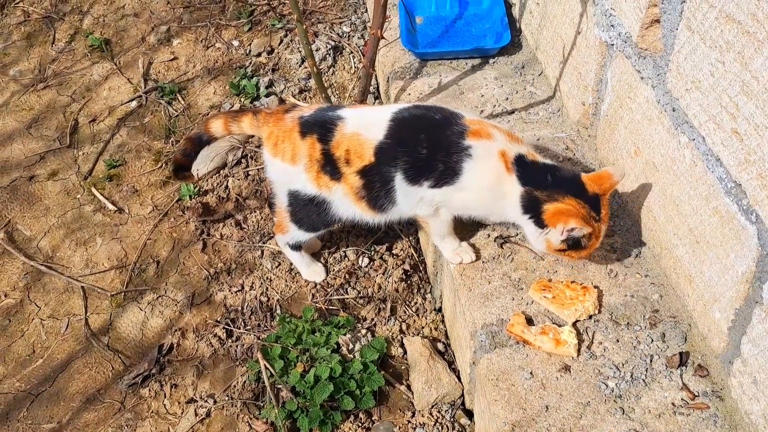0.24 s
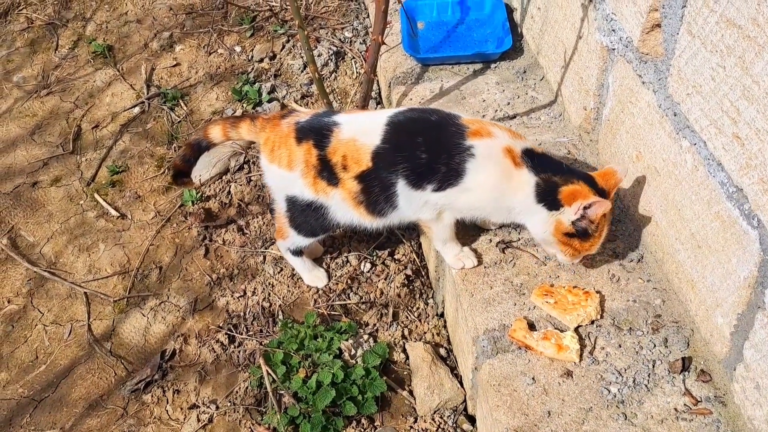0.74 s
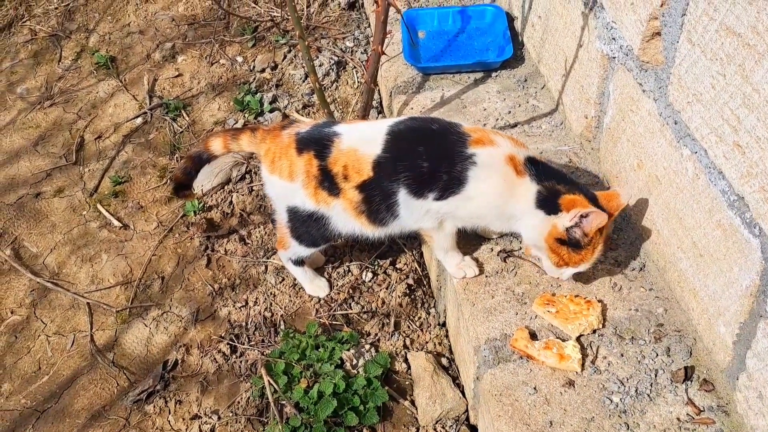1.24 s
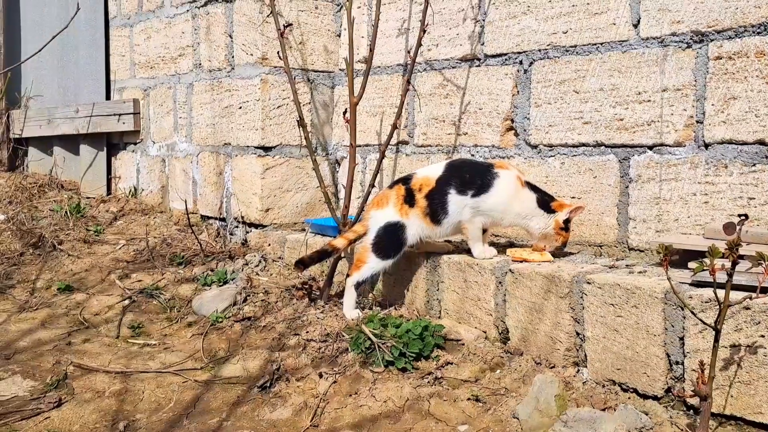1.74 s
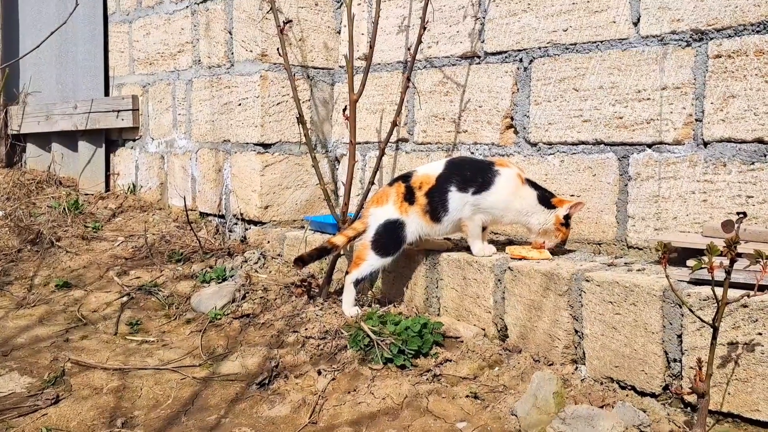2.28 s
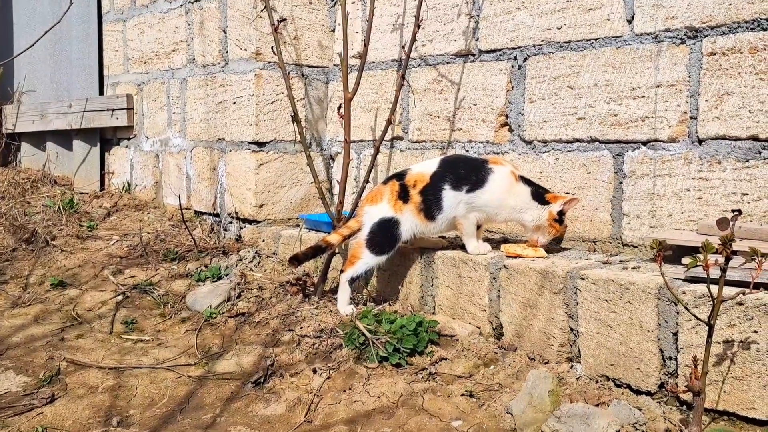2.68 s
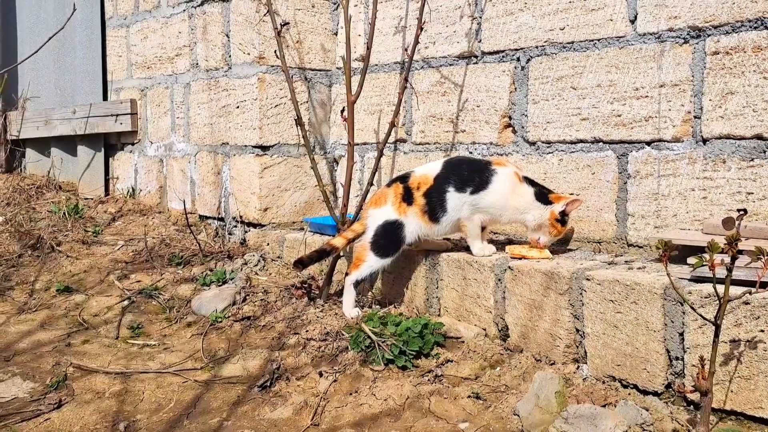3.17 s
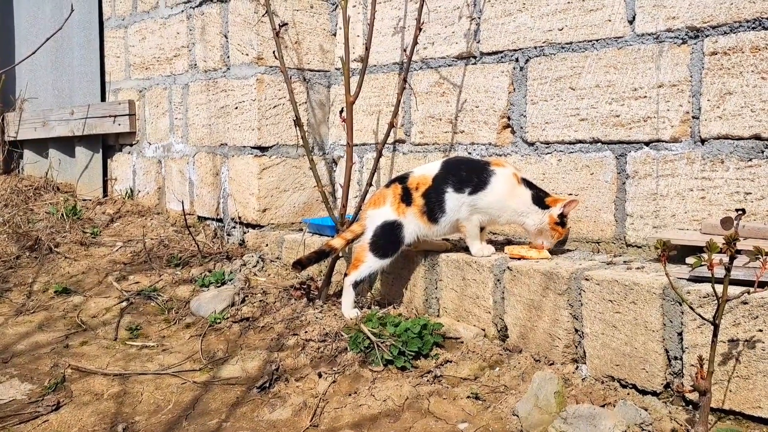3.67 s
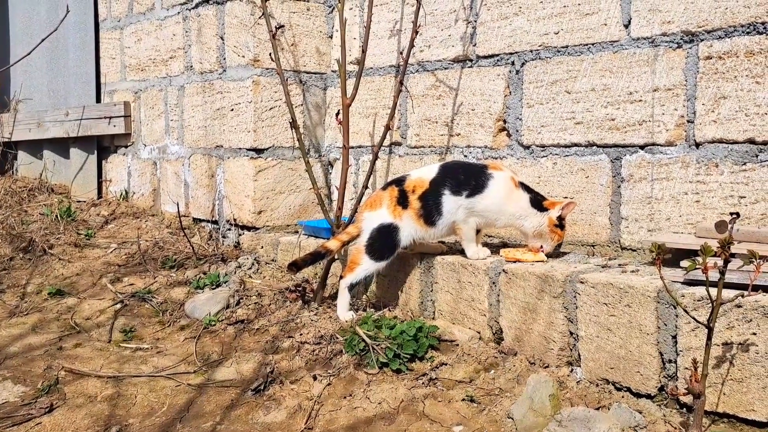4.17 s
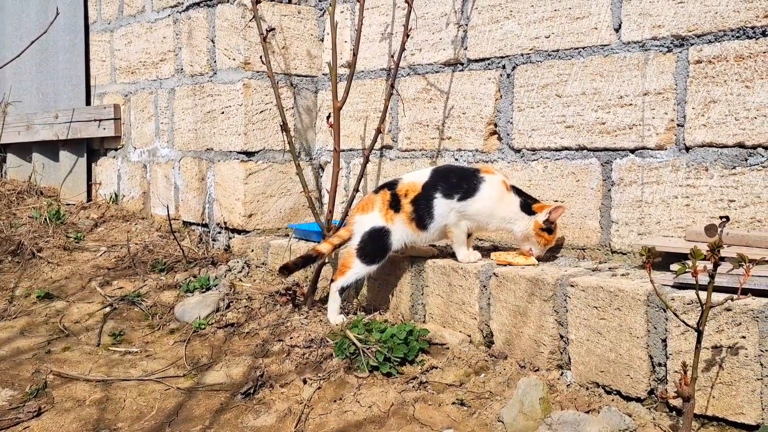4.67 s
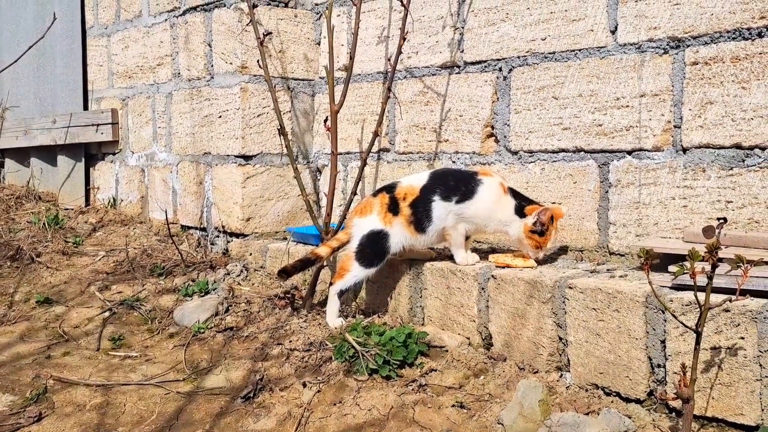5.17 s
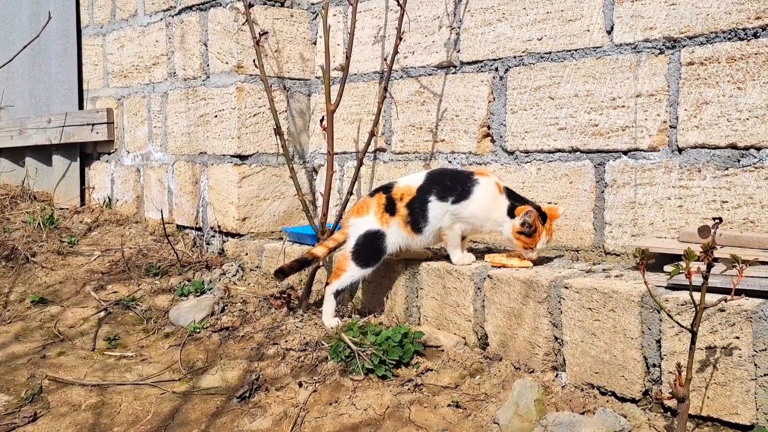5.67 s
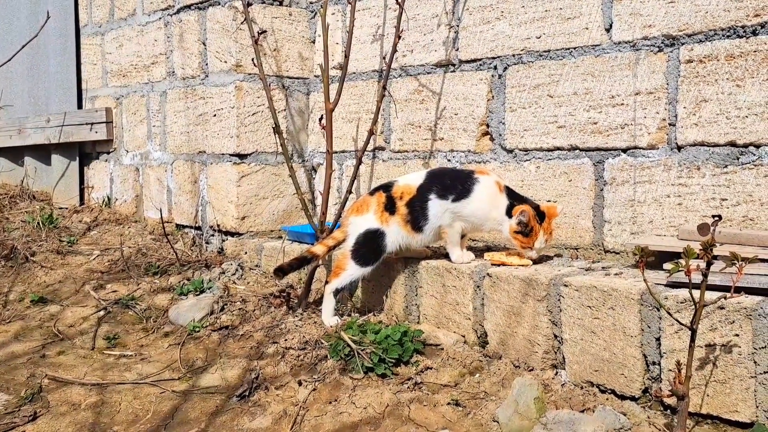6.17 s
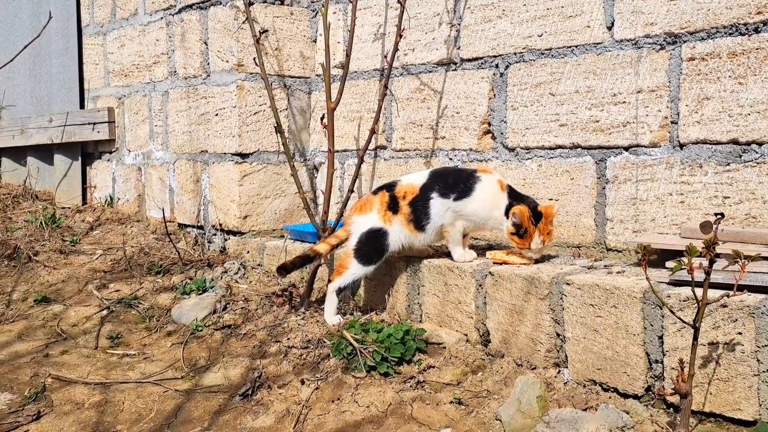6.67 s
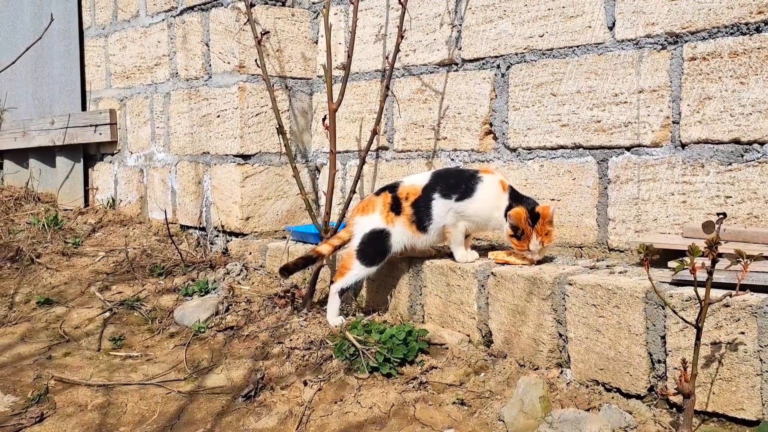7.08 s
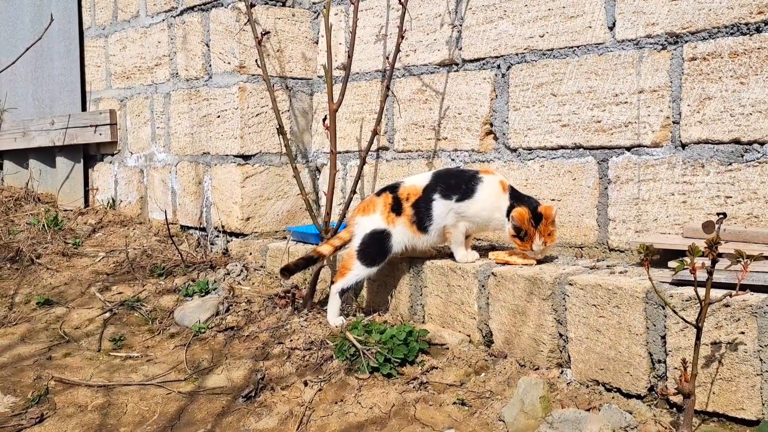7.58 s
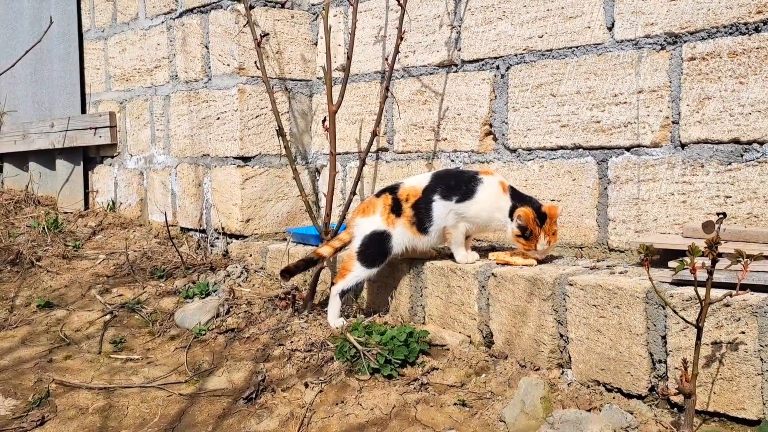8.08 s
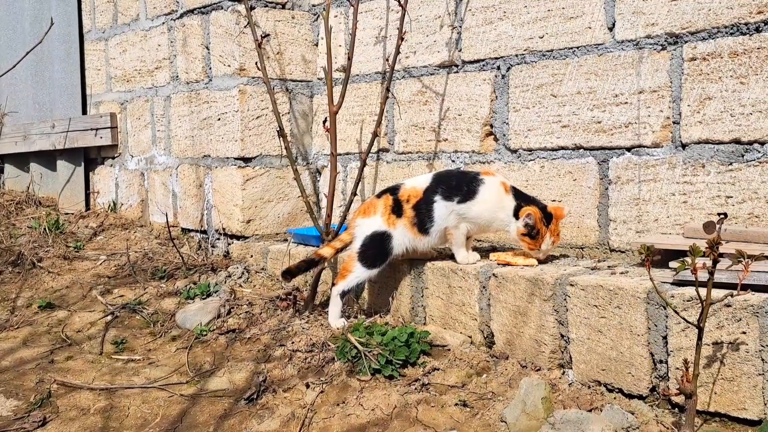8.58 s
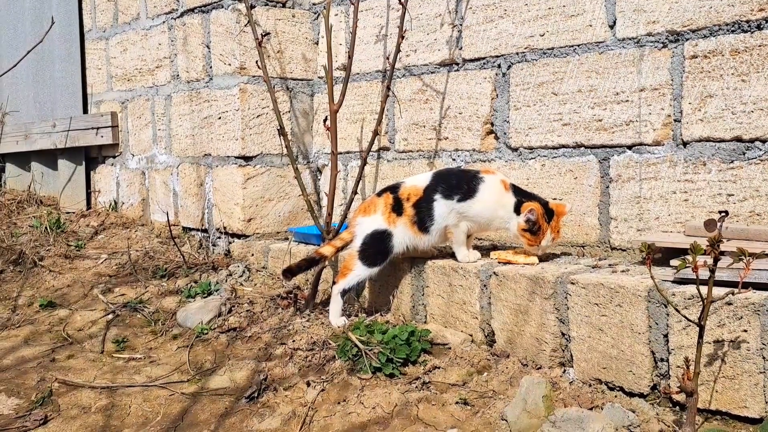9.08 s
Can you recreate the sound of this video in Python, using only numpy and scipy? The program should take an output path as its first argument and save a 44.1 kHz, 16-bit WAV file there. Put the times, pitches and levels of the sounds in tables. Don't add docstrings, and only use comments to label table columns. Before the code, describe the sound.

Small birds whistle and chirp in a quiet yard over low distant traffic rumble, with a burst of loud handling knocks and rubs early on.

```python
import sys
import numpy as np
from scipy import signal
from scipy.fft import rfft, irfft
from scipy.io import wavfile
from scipy.ndimage import uniform_filter1d

SR = 44100
rng = np.random.default_rng(int(sys.argv[2]) if len(sys.argv) > 2 else 0)


def digitize_waveform(pressure):
    field = np.atleast_2d(pressure).T
    bounded = np.clip(field, -1, 1)
    quanta = np.round(bounded * 32767).astype(np.int16)
    wavfile.write(sys.argv[1], SR, quanta)


def gain_from_decibels(decibels):
    exponent = np.asarray(decibels, float) / 20
    return 10 ** exponent


N = 411894
LAG = 21
FAINT_PAN_DB = -6


def evened(x):
    return x / np.sqrt(np.mean(x ** 2) + 1e-20)


def read(points, hz):
    f, value = np.transpose(points)
    return np.interp(np.log(hz + 1), np.log(f + 1), value)


def add(mix, s, sound):
    part = mix[..., round(s * SR):][..., :sound.shape[-1]]
    part += sound[..., :part.shape[-1]]


def wander(count, hz):
    smoother = signal.butter(4, hz, fs=SR, output="sos")
    settle = 4000
    return evened(signal.sosfilt(smoother, rng.standard_normal(count + settle))[settle:])


def sing(shape, db, pan_db, trill_hz=210., swing_hz=0., throb=0., rough=0., blur_hz=0., octave_db=-47.0,
         third_db=-79.0):
    s, hz, shape_db = np.transpose(shape)
    t = np.arange(0, s[-1], 1 / SR)
    trill = np.sin(2 * np.pi * trill_hz * t)
    hz = uniform_filter1d(np.interp(t, s, hz), size=80)
    hz = hz + swing_hz * trill + blur_hz * wander(len(t), 400.)
    phase = 2 * np.pi * np.cumsum(hz) / SR
    level = gain_from_decibels(db + np.interp(t, s, shape_db))
    level = level * (1 + throb * trill + rough * wander(len(t), 120.0))
    tone = np.sin(phase) + gain_from_decibels(octave_db) * np.sin(2 * phase) + gain_from_decibels(third_db) * np.sin(3 * phase)
    tone = level * tone * signal.windows.tukey(len(t), .08)
    left, right = np.pad(tone, (0, LAG)), np.pad(tone, (LAG, 0))
    return np.array([left, gain_from_decibels(-pan_db) * right])


def whistle(mix, s, length, db, hz, sag_hz_per_s, pan_db, rough=.22):
    end_hz = hz - sag_hz_per_s * length
    shape = [(0, hz + 40, -16),
             (.3 * length, .7 * hz + .3 * end_hz, -2),
             (.7 * length, .2 * hz + .8 * end_hz, 0),
             (length, end_hz, -10)]
    add(mix, s, sing(shape, db, pan_db, rough=rough, octave_db=-55, third_db=-54))


def whistlers(near, far):
    # start in seconds, level of the high note in dB, of the low note in dB, high pitch in Hz,
    # left-right balance in dB.
    pairs = [
        (2.141, -45.5, -39.5, 4530, -2.5),
        (2.363, -38, -38.5, 4510, -4.5),
        (2.896, -33.5, -36, 4605, -7),
        (6.743, -36, -30.5, 4587, -6.5),
        (6.949, -30, -28.5, 4540, -4),
    ]
    # start in seconds, level of the first note in dB, of the repeat in dB, pitch in Hz,
    # left-right balance in dB.
    doubles = [
        (0.809, -51.5, -52, 4400, 0),
        (1.485, -42.5, -51, 4350, 13),
        (7.576, -45, -47, 4365, -6),
        (8.235, -42.5, -46.5, 4344, -3),
        (8.954, -54, -52.5, 4297, -9),
    ]
    # start in seconds, length in seconds, level in dB, pitch in Hz.
    faint = [(1.793, 0.04, -72, 4560), (2.347, 0.041, -53, 4300), (3.088, 0.1, -76.5, 4470),
             (4.652, 0.023, -66.5, 4570), (4.7, 0.037, -74, 4560), (4.745, 0.034, -71, 4000),
             (4.845, 0.053, -59, 4554), (4.966, 0.022, -69.5, 3430), (5.198, 0.03, -59, 4560),
             (5.25, 0.067, -75, 4610), (5.368, 0.087, -62, 4564), (5.522, 0.033, -73, 3400),
             (5.617, .035, -74.5, 6720), (5.734, 0.035, -60, 4600), (5.774, 0.054, -68, 4580),
             (5.92, 0.048, -64, 4580), (6.267, 0.11, -59, 4590), (6.62, 0.048, -71, 4330),
             (7.087, 0.098, -56, 4360), (7.548, .04, -60, 4540), (7.899, 0.044, -62.5, 4480)]
    for s, db, low_db, hz, pan_db in pairs:
        whistle(near, s, .043, db, hz, 1700, pan_db)
        whistle(near, s + .055, .052, low_db, hz - 142.2, 1700, pan_db - 1)
    for s, first_db, again_db, first_hz, pan_db in doubles:
        for at, db, hz in [(s, first_db, first_hz), (s + .165, again_db, first_hz - 30)]:
            whistle(near, at, .092, db, hz, 750, pan_db)
            snap = [(0, 3000, -3), (.008, 7800, 0)]
            add(far, at - .005, sing(snap, db - 18, pan_db, rough=.5))
    for s, length, db, hz in faint:
        whistle(near, s, length, db, hz, 200, FAINT_PAN_DB, rough=.3)


def chips(near):
    # start in seconds, level in dB, lowest pitch in Hz, highest pitch in Hz.
    chip_rows = [
        (.168, -87, 6650, 8000),
        (4.424, -73, 4470, 8700),
        (5.536, -74, 6730, 7800),
        (5.648, -66.5, 6110, 7770),
        (5.9, -70, 4755, 7000),
        (6.929, -61.5, 3790, 6550),
        (7.093, -60.5, 3430, 7640),
        (8.48, -69.5, 7140, 8000),
        (8.715, -74, 6840, 7740),
        (8.798, -79, 10000, 11780),
    ]
    for s, db, low_hz, high_hz in chip_rows:
        shape = [(0, low_hz, 0.017), (.008, high_hz, 0.0073)]
        add(near, s, sing(shape, db, FAINT_PAN_DB, rough=0.33))


def songs(near, far):
    # seconds after its start, pitch in Hz, level in dB.
    rise = [(0, 2400, -35), (.015, 3000, -28), (.027, 3550, -11), (.04, 3780, -9), (.052, 4110, 0),
            (.068, 4170, -2), (.093, 3950, -13)]
    lead = [(0, 3543, -17), (.012, 3588, 2), (.035, 3640, -1.5)]
    seep = [(0, 7750, 0), (.012, 7600, 4), (.045, 7240, 5), (.07, 7230, -1), (.088, 7230, -22)]
    fall = [(0, 5330, -3.5), (.018, 5150, 7), (.04, 4803, 0), (.058, 4400, -4), (.072, 4030, -2.5),
            (.11, 3909, -1), (.18, 3816, -4.5)]
    buzz = [(0, 3920, -17), (.04, 3933, 1), (.065, 3912, -0.5), (.1, 3920, -6.5), (.135, 3936, -24)]
    arch = [(0, 4700, -16), (.012, 5200, -6), (.026, 5550, 0), (.037, 5600, 0), (.046, 4900, -8)]
    drift = [(0, 7850, -3), (.03, 7700, 0), (.15, 7300, -4), (.3, 6700, -5), (.4, 6300, -12)]
    slide = [(0, 7810, -8.5), (.04, 7900, -13.5), (.1, 6500, -24.5), (.13, 6310, -25.5)]
    # start in seconds, peak in dB, pitch factor, left-right balance in dB.
    rises = [(0.855, -45, 0.99, -8.5), (1.043, -60, 1.04, -5), (1.121, -44.5, 0.97, -9.5),
             (1.391, -43, 0.96, -5), (1.623, -40.5, 1, 3.5), (3.177, -39, 0.97, -4), (4.258, -40, 1, -7),
             (4.527, -35, .99, -3), (6.008, -35.5, 1, -4.5), (6.258, -33.5, .995, -3.5)]
    seeps = [
        (0.681, -57.5, .98, -12.5),
        (4.09, -51.5, 0.98, -11.5),
        (5.83, -58, 0.99, -17),
    ]
    falls = [
        (1.143, -54, 1.016, -4.5),
        (1.838, -47, .99, 17),
        (2.525, -41, 1.006, -4.5),
        (7.28, -47, 1.01, -5.5),
        (7.921, -45.5, 1, -4),
        (8.575, -53, 1.046, -10),
        (9.298, -49, 1.03, -3.5),
    ]
    buzzes = [
        (1.245, -53, .98, -6),
        (2.64, -43, .995, -8),
        (2.81, -56, .99, -6),
        (7.203, -33, 1, -7),
    ]
    arches = [(3.592, -73, .97, -12), (3.659, -67, 1, -12), (3.747, -65, 1, -12), (3.852, -66, 1, -12),
              (3.975, -69, .98, -9), (6.235, -64, 1, -6), (6.33, -61, 1, -6), (6.44, -61, .97, -8),
              (8.685, -67, 1, -5.5), (8.758, -62, 1.03, -6), (8.85, -61, 1.01, -7), (8.96, -61, 1.03, -8)]
    drifts = [
        (6.796, -69.5, 0.96, -8.5),
    ]
    slides = [
        (2.061, -66, 0.89, 11),
        (6.795, -57.5, 0.86, -1.5),
        (6.889, -56, 0.92, -3),
        (6.991, -57.5, 0.9, -7),
        (7.07, -64.5, 0.86, -5),
    ]
    # multiple, level in dB.
    arch_stack = [
        (12, 0),
        (13, -2),
        (14, 0),
        (18, -9),
    ]
    leads = np.add(rises, [-.014, -25, .015, 0])
    hooks = np.concatenate([np.multiply(arches, [1, 1, k / 14, 1]) + [0, db, 0, 0] for k, db in arch_stack])
    voices = [
        (rise, rises, far, dict(rough=.5, throb=.3, trill_hz=150, blur_hz=85, octave_db=-32)),
        (lead, leads, far, dict(rough=0.44, blur_hz=60.3)),
        (seep, seeps, near, dict(rough=.3, octave_db=-50)),
        (fall, falls, far, dict(swing_hz=185, throb=-.3, rough=.3, blur_hz=42, trill_hz=220)),
        (buzz, buzzes, near, dict(swing_hz=110, throb=.2, rough=.2, blur_hz=25, trill_hz=215, octave_db=-44)),
        (arch, hooks, near, dict(rough=.4, blur_hz=60, octave_db=-60)),
        (drift, drifts, far, dict(rough=.7, blur_hz=260, octave_db=-60)),
        (slide, slides, far, dict(rough=.6, blur_hz=200, octave_db=-60))]
    for shape, rows, mix, voice in voices:
        for s, db, pitch, pan_db in rows:
            add(mix, s, sing(np.multiply(shape, [1, pitch, 1]), db, pan_db, **voice))


def yard(x, t60, start):
    t = np.arange(SR // 2) / SR
    hits = rng.random((2, len(t))) < .04
    taps = rng.standard_normal((2, len(t))) * hits * gain_from_decibels(-60 * t / t60) * (t > start)
    taps = taps / np.linalg.norm(taps, axis=1)[:, None]
    return signal.fftconvolve(x, taps, axes=1)[:, :N]


def birds():
    near, far = np.zeros((2, 2, N))
    whistlers(near, far)
    chips(near)
    songs(near, far)
    near_echo = gain_from_decibels(-7.5) * yard(near, .14, .006) + gain_from_decibels(-23) * yard(near, .8, .021)
    far_echo = gain_from_decibels(-3.5) * yard(far, .13, .002) + gain_from_decibels(-19) * yard(far, .45, .03)
    return near + near_echo + far + far_echo


def stroke(length, bright, grit):
    # frequency in Hz, level in dB per Hz.
    heavy_colour = [(18, -39.5), (30, 6.5), (145, 2.5), (540, -8), (632, -11.5), (2200, -19.5), (4080, -25),
                    (8300, -59.5), (12300, -43.5), (16000, -57)]
    light_colour = [(18, -28), (30, -0.5), (822, -3.5), (1010, -5), (1390, -8), (3980, -7.5), (8740, -25.5),
                    (12600, -15.5), (16000, -33)]
    count = round(length * SR)
    grains = rng.standard_normal(count) * gain_from_decibels(grit * wander(count, 350.))
    hz = np.fft.rfftfreq(count, 1 / SR)
    colour_db = (1 - bright) * read(heavy_colour, hz) + bright * read(light_colour, hz)
    return evened(irfft(rfft(grains) * gain_from_decibels(colour_db), count))


def rubs(out):
    # start in seconds, length in seconds, level in dB, dB lost by the end, brightness (0 heavy, 1 light).
    rub_rows = [(1.421, 0.057, -31.5, 1, 0), (1.472, 0.037, -27.5, -4, 0), (1.507, 0.012, -24, -0.5, 0.26),
                (1.519, 0.11, -17, -3.5, 0.25), (1.615, 0.084, -30, 5.5, 0.26), (1.685, 0.11, -41, -2.5, 0),
                (1.812, 0.055, -34, -2.5, 0), (1.9, 0.059, -27, 4.5, 0), (1.991, 0.095, -42.5, 3, 0),
                (2.141, 0.054, -37, -5.5, 0.43), (2.238, 0.035, -44.5, -3.5, 0.37),
                (2.406, 0.048, -48.5, 7, 0.7), (2.448, 0.082, -44, 7, 0.72), (2.673, 0.088, -15, 13, 0.9),
                (2.742, 0.11, -44, -1.5, 0.3), (2.823, 0.062, -21, 25, 0.98), (2.845, 0.19, -48.5, 15, 1.4),
                (3.098, 0.36, -57, 12.5, 1.7)]
    for s, length, db, lost_db, bright in rub_rows:
        rub = stroke(length, bright, 1.8)
        level = gain_from_decibels(db - np.linspace(0, lost_db, len(rub)))
        add(out, s, level * rub * signal.windows.tukey(len(rub), .3 if db > -24 else .7))


def skims(out):
    # start in seconds, length in seconds, level in dB, brightness (0 heavy, 1 light).
    skim_rows = [
        (1.951, 0.048, -59, 0.4),
        (2.069, .07, -58.5, 0.33),
        (2.19, 0.077, -57, .3),
        (2.262, 0.094, -61, .3),
        (2.531, 0.2, -60.5, 0.2),
    ]
    for s, length, db, bright in skim_rows:
        skim = stroke(length, bright, 1.556)
        add(out, s, gain_from_decibels(db) * skim * signal.windows.tukey(len(skim), .3))


def knocks(out):
    # start in seconds, peak of the tick in dB, thump over it in dB, crack over it in dB. The last row
    touches = [(1.301, -39, -6, -19.5), (1.44, -44, 10, -36), (1.478, -35.5, -5, -27.5),
               (1.512, -22.5, 0.5, -29.5), (1.678, -17, -28, -19), (1.679, -3.5, -8, -19.5),
               (1.683, -18.5, 0.5, -29), (1.91, -34, -3, -23), (1.926, -37, -7, -25.5),
               (2.149, -33.5, -10, -28), (2.158, -34, -2, -42.5), (2.166, -18, -14, -23.5),
               (2.168, -11, -5, -17.5), (2.243, -40, -12, -13), (2.253, -15, -31, -19),
               (2.257, -24, -5, -22), (2.374, -51, -5, -16), (2.407, -37.5, -8, -14),
               (2.421, -46.5, -1, -15), (2.457, -37, -4, -15), (2.509, -51, -6, -10), (2.573, -49, -3, -28),
               (2.686, -23.5, -20, -17), (2.707, -11, -18, -19), (2.71, -14.5, -12.5, -21),
               (2.768, -31.5, -1, -36.5), (2.783, -40, -2, -54), (2.808, -23, -14, -36),
               (2.871, -45, -4, -22), (3.103, -58.5, 12, 1), (3.537, -67.5, 10.5, 14)]
    lifts = [(1.515, -20.5, -7.5, -3), (1.528, -26, -18.5, -5), (1.546, -18.5, -31.5, -9.5),
             (1.645, -36, -6, -23), (1.697, -28.5, -3, -41), (1.712, -40.5, -2.5, -24),
             (1.73, -12.5, -32, -68), (1.765, -44.5, 7.5, -17.5), (1.789, -48, 11, -36),
             (1.819, -33.5, 1, -28), (1.898, -16.5, -21, -36), (1.9, -13.5, -11.5, -29.5),
             (2.007, -37, 4, -26), (2.022, -32, 1, -49), (2.038, -33.5, -0.5, -50), (2.044, -37, 4, -46),
             (2.068, -26, -6.5, -68), (2.13, -28, -8.5, -44), (2.139, -39, 1, -40.5),
             (2.184, -39.5, 0, -26.5), (2.492, -46, 9.5, -4), (2.826, -18, -24, -10),
             (2.83, -22.5, -2.5, -28.5), (1.286, -65.5, -20, 12)]
    t = np.arange(1500) / SR
    soft = 1 - np.exp(-t / .00025)
    for s, db, thump_db, crack_db, sign in [(*k, 1) for k in touches] + [(*k, -1) for k in lifts]:
        tick = -np.sin(2 * np.pi * 560 * rng.uniform(.7, 1.3) * t) * gain_from_decibels(-60 * t / .007)
        ping = np.sin(2 * np.pi * 1900 * rng.uniform(.8, 1.2) * t) * gain_from_decibels(-60 * t / .004)
        tick += gain_from_decibels(.5 * crack_db + 9) * ping
        falling = t - 9 * t ** 2
        thump = -np.sin(2 * np.pi * 210 * rng.uniform(0.6, 1.56) * falling) * gain_from_decibels(-60 * t / 0.013)
        crack = np.diff(stroke(0.21, 0.31, 0.)[:len(t) + 1]) * gain_from_decibels(-60 * t / 0.008)
        body = sign * soft * (tick + gain_from_decibels(thump_db + 12.0) * thump)
        add(out, s + 0.0018, gain_from_decibels(db + 6) * (body + gain_from_decibels(crack_db + 15.5) * crack))


def heaves(out):
    # start in seconds, level in dB, pitch in Hz, t60 in seconds.
    heave_rows = [
        (1.622, 1.5, 120, 0.025),
        (1.699, -10.5, 70.9, 0.037),
        (2.461, -28.5, 130, 0.058),
        (2.495, -19.5, 63, 0.11),
    ]
    t = np.arange(SR // 8) / SR
    for s, db, hz, t60 in heave_rows:
        add(out, s, gain_from_decibels(db - 60 * t / t60) * np.sin(2 * np.pi * hz * t) * (1 - np.exp(-t / .002)))


def grip():
    # time in seconds, level in dB.
    pressure = [
        (1.35, -57),
        (1.489, -45),
        (1.614, -37),
        (1.639, -45.5),
        (2.225, -55.5),
        (2.456, -59.5),
        (2.652, -48),
        (2.75, -38),
        (2.946, -55.5),
        (3.2, -70),
    ]
    s, db = np.transpose(pressure)
    rumble = np.diff(wander(N + 1, 77.0)) * gain_from_decibels(4.0 * wander(N, 25.))
    return gain_from_decibels(np.interp(np.arange(N) / SR, s, db, -120, -120) - 3.5) * evened(rumble)


def finger():
    out = np.zeros(N)
    rubs(out)
    knocks(out)
    heaves(out)
    skims(out)
    return out + grip()


def rake():
    # start in seconds, length in seconds, rms level in dB, share of the stroke spent rising, treble in dB.
    pulls = [
        (0.171, 0.25, -59.5, 0.46, -6),
        (5.67, .22, -67, .4, -12),
        (5.967, 0.21, -67, 0.39, -12.5),
        (6.169, .24, -64.5, 0.46, -12.5),
        (6.441, 0.19, -65.5, 0.33, -4.5),
        (6.779, .19, -69, 0.33, -9),
        (6.977, 0.15, -65, 0.26, -9),
        (7.43, 0.25, -54, 0.53, 1.5),
        (7.796, 0.23, -78, 0.32, -12),
        (9.201, 0.18, -58.5, 0.53, -2.5),
    ]
    # frequency in Hz, level in dB per Hz.
    tines = [(600, -36.5), (1250, -14), (1900, -3.5), (2340, -1), (2900, -13), (4030, -2.5), (5100, -9),
             (6100, -11), (8500, -44.5)]
    out = np.zeros((2, N + SR))
    count = round(.4 * SR)
    hz = np.fft.rfftfreq(count, 1 / SR)
    same, pan_db = .7, -6.5
    for s, length, db, rising, treble_db in pulls:
        u = np.arange(count) / SR / length
        colour = gain_from_decibels(read(tines, hz) + treble_db * (hz > 2900))
        a, b = (evened(irfft(rfft(rng.standard_normal(count)) * colour, count)) for _ in "ab")
        pull_db = np.interp(u, [0, rising, .95, 1.15], [-17, 0, -6, -30])
        level = gain_from_decibels(db + pull_db + 1.1 * wander(count, 60.)) * (u < 1.15)
        right = same * np.roll(a, LAG) + np.sqrt(1 - same ** 2) * b
        add(out, s, level * np.array([a, right]) * gain_from_decibels([[pan_db / 2], [-pan_db / 2]]))
    return out[:, :N]


def hum(s, length, first_hz, last_hz, db, orders_db):
    out, count = np.zeros(N), round(3 * SR)
    t = np.arange(count) / SR
    hz = np.interp(t, [0, length], [first_hz, last_hz]) * (1 + .015 * wander(count, 3.))
    phase = 2 * np.pi * np.cumsum(hz) / SR
    edge = np.minimum(t, length - t) / .087
    level = gain_from_decibels(db - 18 * (1 - np.clip(edge, 0, 1))) * (edge > 0)
    tones = sum(gain_from_decibels(d + 3 * wander(count, 6.)) * np.sin(k * phase) for k, d in orders_db)
    add(out, s, level * tones)
    return out


def engine():
    # start in seconds, length in seconds, first pitch in Hz, last pitch in Hz, level in dB.
    engines = [
        (0, 0.58, 67.2, 58.5, -66.5),
        (0.617, 0.7, 53.46, 50.3, -49.5),
        (1.303, 2.5, 56, 58.83, -57.5),
        (3.442, 2.5, 50.48, 55.04, -64),
        (5.696, 1.104, 57.9, 62.15, -64.5),
        (6.8, 1.87, 63.12, 64.16, -60.5),
        (6.901, 2.36, 48.46, 51.1, -62),
    ]
    whines = [
        (1.5, .85, 155, 190, -67),
        (2.8, .5, 150, 149, -69),
        (3.5, 2.0, 152, 167, -70),
        (3.5, 2.3, 76, 85, -64),
        (3.2, 1.0, 575, 588, -77),
    ]
    # multiple of the engine pitch, level in dB.
    orders_db = [
        (1, 4.5),
        (1.5, -14.5),
        (2, -16.5),
    ]
    motors = sum(hum(*row, orders_db) for row in engines)
    return motors + sum(hum(*row, [(1, 0.0047)]) for row in whines)


def air():
    # frequency in Hz, level in dB per Hz.
    air_before = [(15, -35), (30, 1.5), (70, -8.5), (123, -16), (242, -10.5), (405, -33), (1230, -32),
                  (1940, -37), (2760, -47.5), (4030, -31), (4870, -42), (7500, -46.5), (8700, -59),
                  (12500, -52), (16000, -53)]
    air_after = [(15, -28.5), (35, -7), (58, -5.5), (120, -21), (260, -29.5), (400, -39), (1200, -45),
                 (2000, -50.5), (2900, -55), (4300, -42.5), (7500, -52.5), (8700, -66), (12500, -58),
                 (16000, -58)]
    air_db = -52.5, -50.5
    # time in seconds, level in dB.
    traffic = [
        (0, -4),
        (1.281, 5),
        (1.299, -2.5),
        (2.2, 0),
        (3.1, -4),
        (3.7, -5.5),
        (4.4, -10.5),
        (5.6, -13.5),
        (9.34, -10.5),
    ]
    # middle in seconds, half length in seconds, dB over the lull.
    bouts = [
        (1.1, .3, 11),
        (4.45, .2, 6),
        (4.9, .15, 7),
        (5.75, .12, 7),
        (6.2, .27, 12),
        (6.68, .06, -6),
        (7.05, .2, 11),
        (7.35, .12, 10),
        (8.75, .25, 10),
    ]
    # frequency in Hz, likeness of the two ports (0-1).
    port_likeness = [(60, 1), (180, 0.72), (550, 0.0092), (1650, 0.88), (4970, 0), (8500, 0),
                     (15000, 0.099)]
    # frequency in Hz, left-right balance in dB.
    port_lean = [(60, -1), (180, -1.5), (550, 2.5), (1650, -8), (4970, -9.5), (15000, -1)]
    join_s, lull_db, roar_share = 1.288, -8, 0.23
    hop, size = 256, 1024
    frames, hz = N // hop + 5, np.fft.rfftfreq(size, 1 / SR)
    a, b, c, d, patches = rng.standard_normal((frames, 513, 5)).T
    patches = evened(uniform_filter1d(uniform_filter1d(patches, 10, 0), 16, 1))
    t = np.arange(frames) * hop / SR
    near_db = np.interp(t, *np.transpose(traffic))
    chatter_db = np.full(frames, float(lull_db))
    for s, half, db in bouts:
        same_side = (t < join_s) == (s < join_s)
        chatter_db += db * np.exp(-((t - s) / half) ** 2) * same_side
    takes = []
    for points, db in zip((air_before, air_after), air_db):
        colour_db = read(points, hz)
        takes.append(db + colour_db - 10 * np.log10(np.mean(gain_from_decibels(2 * colour_db))))
    field_db = np.where(t < join_s, takes[0][:, None], takes[1][:, None])
    field_db += (1.2 + 1.7 * (hz < 8500))[:, None] * patches - 40 * (hz > 15850)[:, None]
    roar = np.exp(-np.log(hz / 620 + 1e-3) ** 2 / .5)[:, None]
    rumble = (1 / (1 + (hz / 300) ** 2))[:, None]
    chatter = np.exp(-np.log(hz / 5000 + 1e-3) ** 2 / .3)[:, None]
    field_db += roar * roar_share * near_db + rumble * near_db + chatter * chatter_db
    same = np.clip(read(port_likeness, hz), -1, 1)[:, None]
    lean = gain_from_decibels(read(port_lean, hz) / 2)[:, None]
    left = a + 1j * b
    right = same * left + np.sqrt(1 - same ** 2) * (c + 1j * d)
    z = np.array([left * lean, right / lean])
    unit = np.std(signal.istft(left, nperseg=size, noverlap=size - hop)[1])
    return signal.istft(z * gain_from_decibels(field_db), nperseg=size, noverlap=size - hop)[1][:, :N] / unit


def scene():
    town = air() + engine() * gain_from_decibels([[-1.5], [1.5]])
    late = np.array([town[0], np.roll(town[1], LAG)])
    return birds() + finger() * gain_from_decibels([[-64], [0]]) + rake() + late


def low_pass(x):
    return signal.sosfilt(signal.butter(12, 16650, fs=SR, output="sos"), x)


def record(dry):
    cut = signal.lfilter(*signal.butter(3, 36, "high", fs=SR), dry)
    held = cut / (1 + (cut / .97) ** 4) ** .25
    return low_pass(held)


dry = scene()
out = record(dry)
digitize_waveform(out)
```